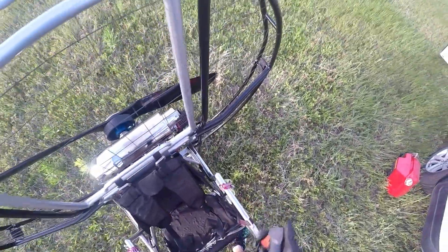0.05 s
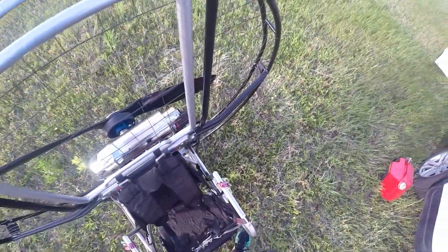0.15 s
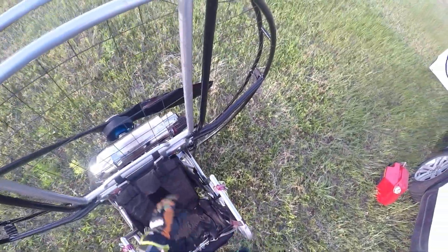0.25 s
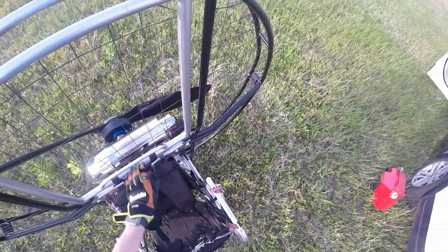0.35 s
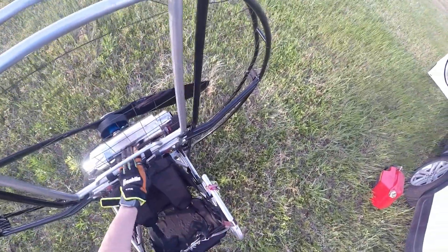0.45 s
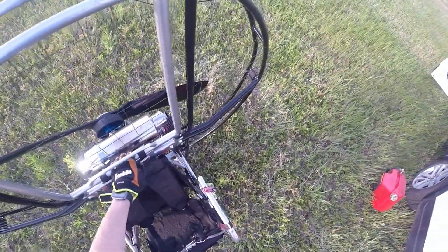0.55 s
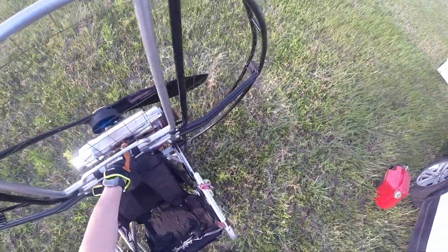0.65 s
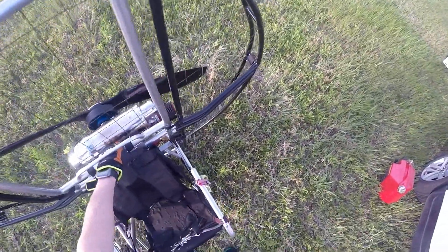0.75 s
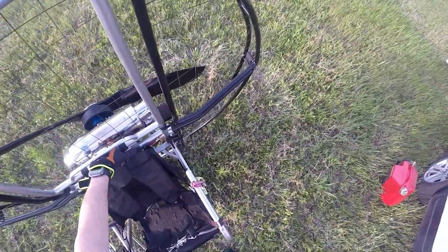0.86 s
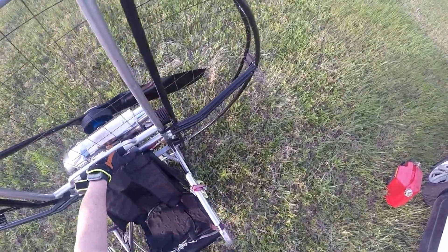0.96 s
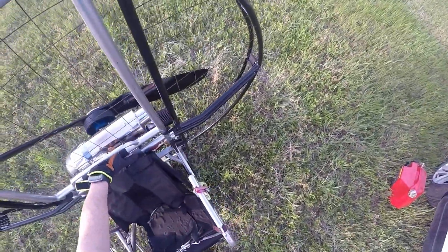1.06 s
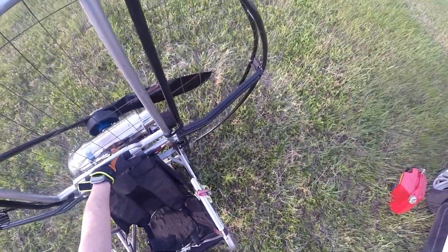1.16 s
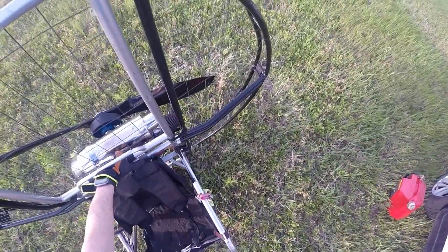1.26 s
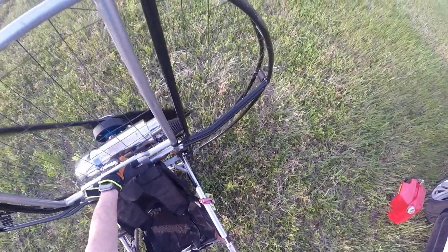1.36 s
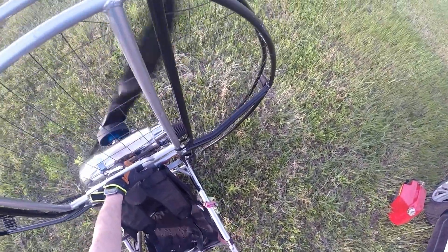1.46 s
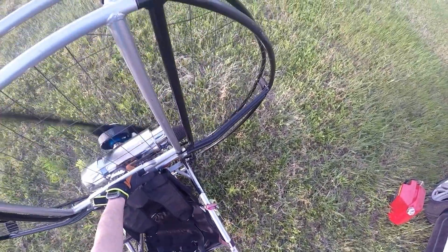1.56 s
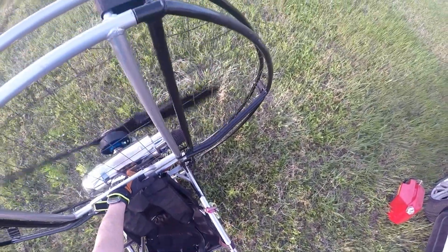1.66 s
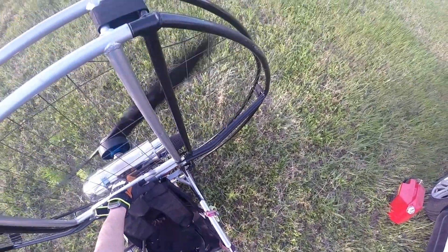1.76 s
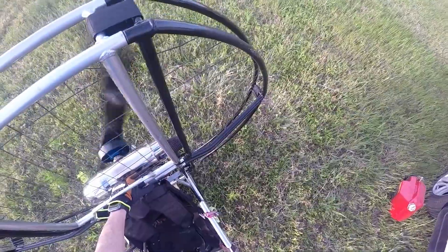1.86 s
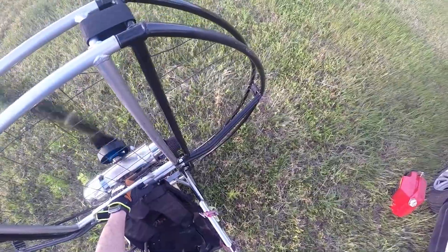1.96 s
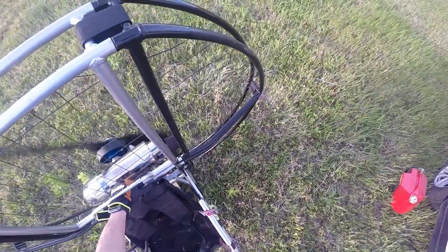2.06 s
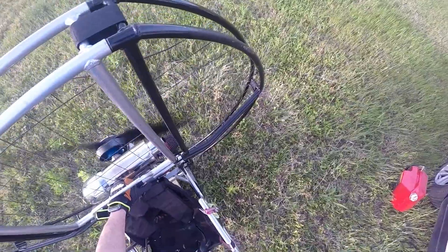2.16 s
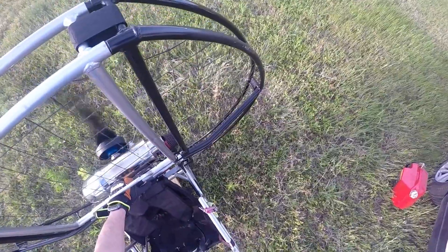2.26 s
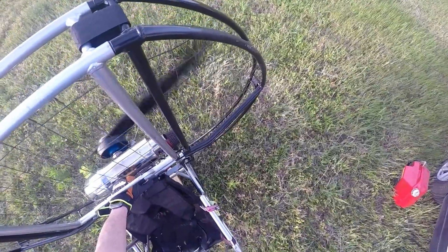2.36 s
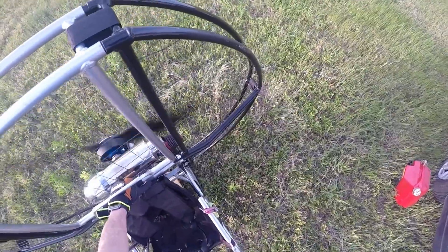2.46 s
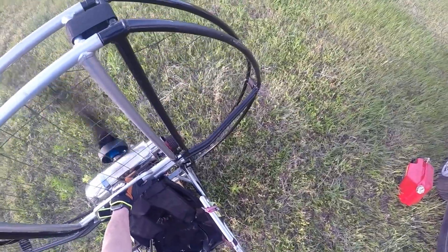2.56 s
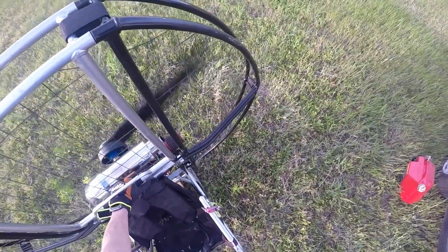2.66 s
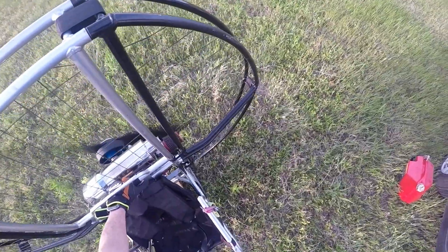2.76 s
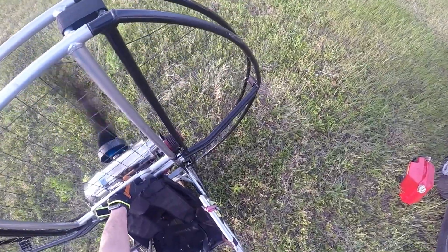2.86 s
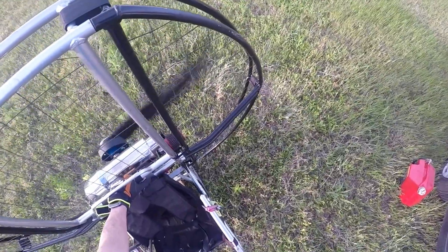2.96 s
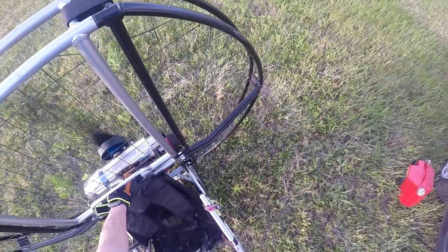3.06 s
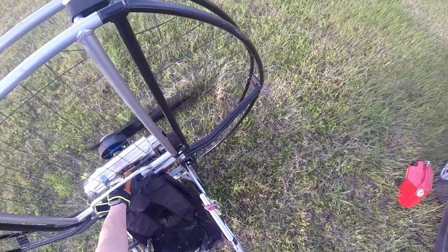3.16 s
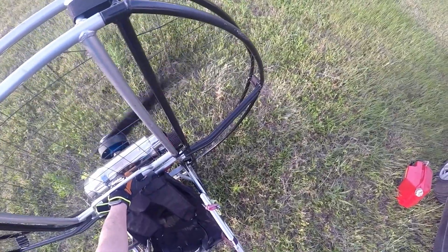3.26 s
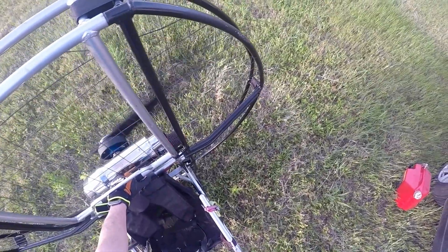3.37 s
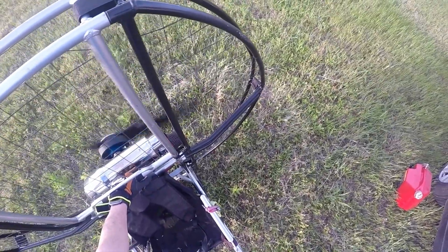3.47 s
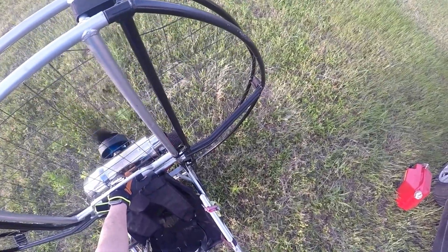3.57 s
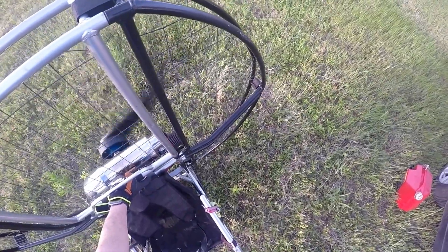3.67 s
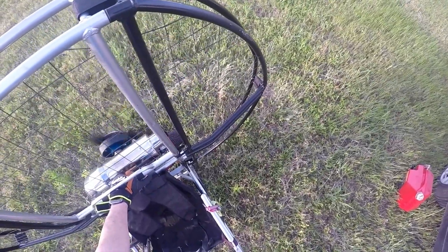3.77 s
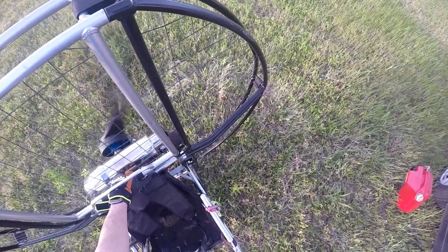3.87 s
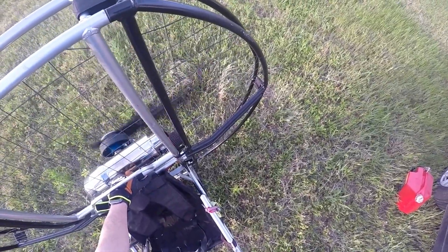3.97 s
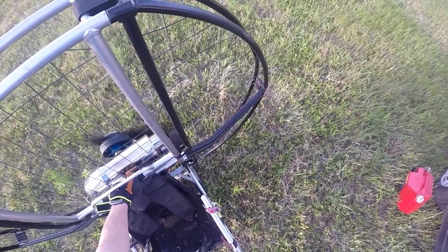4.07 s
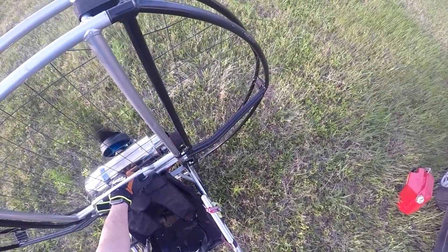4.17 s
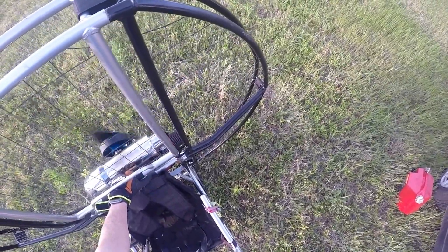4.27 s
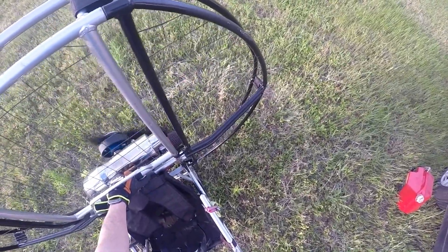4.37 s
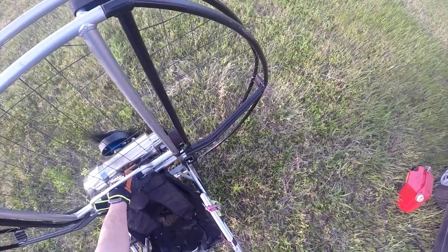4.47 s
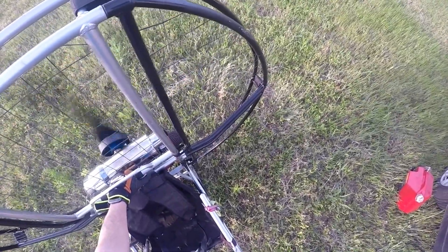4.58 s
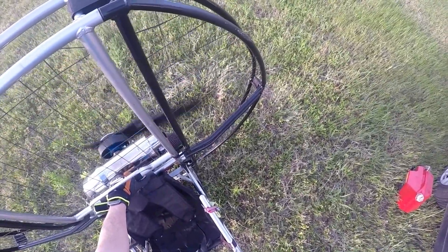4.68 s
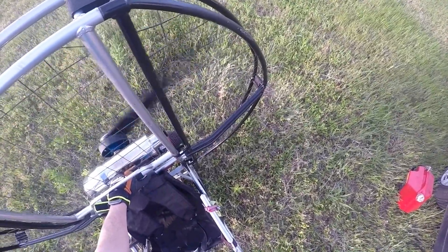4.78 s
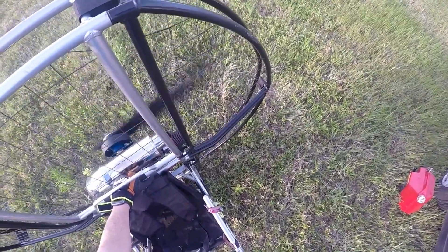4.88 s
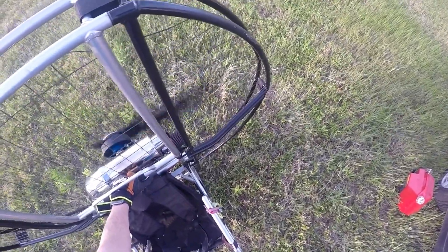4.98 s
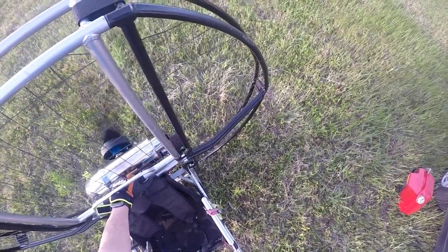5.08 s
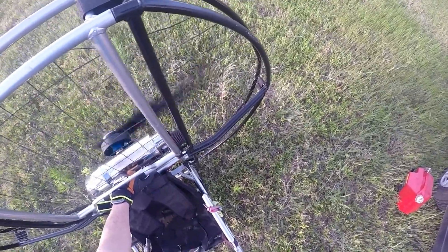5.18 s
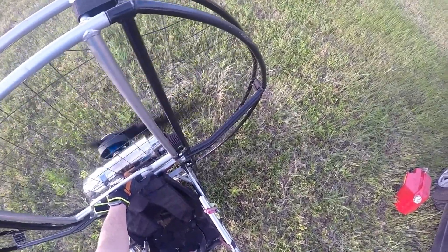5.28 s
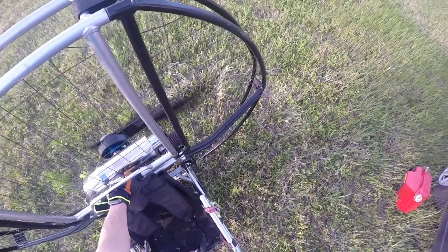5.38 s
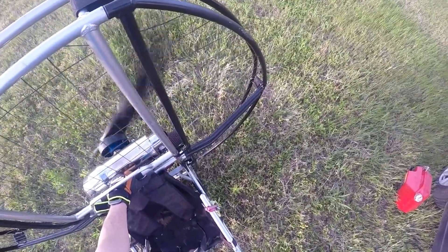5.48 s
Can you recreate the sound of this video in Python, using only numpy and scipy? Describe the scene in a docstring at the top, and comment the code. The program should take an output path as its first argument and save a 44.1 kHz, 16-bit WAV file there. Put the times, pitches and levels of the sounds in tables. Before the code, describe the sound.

An electric starter cranks with a grinding whine, and a small two-stroke engine catches, sputters and pops unevenly outdoors.

```python
"""A faint breeze rumbles over a grass field and a hand taps on a frame. Then, at arm's length, an electric
starter cranks a paramotor's two-stroke; its gears whine, grind until released, and ring on. The engine
catches, fires on every third turn, picks up, then coasts and pops between throttle blips. Each firing is
an impulse that excites resonances: a bark in the exhaust, a knock in the casing. Rattle, grinding,
exhaust hum and propeller wash all grow with crank speed."""
import sys
import numpy as np
from scipy import signal
from scipy.fft import rfft, irfft
from scipy.io import wavfile

SR = 44100
rng = np.random.default_rng(int(sys.argv[2]) if len(sys.argv) > 2 else 0)


def to_wav(sig):
    """Store sig (one row per channel, or 1-D mono) as 16-bit WAV at the path in sys.argv[1].

    Samples outside -1..1 are clipped; the rate is SR.
    """
    pcm = np.clip(np.atleast_2d(sig), -1, 1) * 32767
    pcm = np.round(pcm).astype(np.int16)
    wavfile.write(sys.argv[1], SR, pcm.T)  # frames by channels


N = 243873
T = np.arange(N) / SR
REFERENCE_SPEED = 30  # crank turns per second
MOTOR_ON_S, MESH_S, RELEASE_S, RUN_UP_S = 1.399, 1.44, 3.97, .17  # timing of the starter


def undb(db):
    """Decibels to amplitude ratio."""
    return 10 ** (np.asarray(db) / 20)


def curve(rows, column=1):
    """Linear interpolation of one table column over time."""
    rows = np.array(rows)
    return np.interp(T, rows[:, 0], rows[:, column])


def revs_db(speed, power):
    """Power law: the level change when amplitude grows as a power of crank speed."""
    return 20 * power * np.log10(np.maximum(speed / REFERENCE_SPEED, 1e-6))


def unit(x):
    """Normalisation to rms 1."""
    return x / np.sqrt(np.mean(x ** 2))


def noise():
    """White Gaussian noise."""
    return rng.standard_normal(N)


def cut(x, hz, kind, order=2):
    """Butterworth low- or high-pass."""
    return signal.sosfilt(signal.butter(order, hz, kind, fs=SR, output="sos"), x)


def waver(hz):
    """Random fluctuation of rms 1, mostly slower than hz."""
    return unit(cut(noise(), hz, "low"))


def coloured(spectrum):
    """Spectral shaping of noise, at rms 1."""
    hz, db = np.transpose(spectrum)
    bins_hz = np.arange(N // 2 + 1) * SR / N
    gain = undb(np.interp(np.log(bins_hz + 1), np.log(hz), db))
    return unit(irfft(rfft(noise()) * gain, N))


def resonate(x, modes):
    """Modal superposition: parallel resonances, neighbours in opposite phase."""
    return sum((-1) ** k * undb(db) * signal.lfilter(*signal.iirpeak(hz, hz / width, SR), x)
               for k, (hz, width, db) in enumerate(modes))


def impulses(times, sizes):
    """Impulse train: one sample of the given size at each time."""
    return np.bincount(np.clip(times * SR, 0, N - 1).astype(int), sizes, N)


def bursts(times, db, rise_s, decay_s):
    """An envelope with a smooth attack and exponential decay after each time."""
    t = T[:SR // 4]
    shape = (1 - np.exp(-(t / rise_s) ** 2)) * np.exp(-t / decay_s)
    return signal.fftconvolve(impulses(times, undb(db)), shape / shape.max())[:N]


def impacts(per_s, scatter_db, contact_s):
    """Shot noise: random metal contacts of uneven size, each a brief scrape; rms 1."""
    hits = (rng.random(N) < per_s / SR) * undb(scatter_db * np.clip(noise(), -2, 2))
    energy = signal.lfilter([1], [1, -np.exp(-2 / (contact_s * SR))], hits ** 2)
    return unit(np.sqrt(energy) * noise())


def throb(turns, at, depth_db):
    """Amplitude modulation that peaks at the given fraction of each turn."""
    return undb(depth_db * np.cos(2 * np.pi * (turns - at)))


# Wind buffeting. Each row: frequency in Hz, relative spectral density in dB.
WIND_SPECTRUM = [(10, -11.5), (24, -3.5), (38, -8), (55, -10), (80, -21.5), (120, -26), (200, -36.5),
                 (400, -40.5), (1000, -57.5)]
# The open field's hiss. Each row: frequency in Hz, relative spectral density in dB.
FIELD_SPECTRUM = [(88, -66), (150, -75), (567, -4.5), (1510, -6.5), (1870, -5.5), (2020, -4.5),
                  (2180, -6.5), (3890, -7), (15000, -25.5)]


def air(speed, breeze_db=-48, wash_db=-35, field_db=-66):
    """Turbulence: breeze and propeller wash add in power and rumble under the field's faint hiss."""
    wash = undb(wash_db + revs_db(speed, power=1.04))
    wind = np.hypot(undb(breeze_db), wash) * coloured(WIND_SPECTRUM)
    return wind + undb(field_db + 0.5 * waver(13)) * coloured(FIELD_SPECTRUM)


# A hand grips the frame. Each row: start in seconds, level in dB, pitch in Hz, decay in seconds.
HAND_TAPS = [(.081, -60, 2680, .008), (.295, -65, 2000, 0.032), (.563, -64, 220, 0.0058),
             (.76, -65, 140, .012), (1.07, -57, 199, 0.011)]


def handling():
    """Heavy damping: soft knocks on the frame excite broad, short-lived resonances."""
    taps = 0
    for start, db, hz, decay_s in HAND_TAPS:
        envelope = bursts(np.array([start]), np.array([db]), rise_s=0.0051, decay_s=decay_s)
        taps = taps + envelope * unit(resonate(noise(), [(hz, hz / 2, 0)]))
    return taps


def starter_drive(onset_db=-19, release_db_per_s=174):
    """Exponential growth and decay: the starter's push, 0 to 1, runs up, holds and is released."""
    rise_db = onset_db * np.clip(1 - (T - MOTOR_ON_S) / RUN_UP_S, 0, 1)
    return (T > MOTOR_ON_S) * undb(rise_db - release_db_per_s * np.maximum(T - RELEASE_S, 0))


# The starter's tooth note. Each row: time in seconds, mean tooth rate in Hz, mean level in dB.
TOOTH_NOTE = [(1.45, 1100, -50), (1.5, 1250, -64), (1.535, 1320, -40), (1.61, 1480, -43),
              (1.68, 1720, -33.5), (1.74, 1750, -43), (2.2, 1750, -56)]


def starter_whine(turns, caught_s, swing=0.12):
    """Frequency modulation: until the engine catches, the tooth rate surges and sags once a turn."""
    hz = curve(TOOTH_NOTE) * (1 + swing * np.cos(2 * np.pi * turns)) * (1 + .012 * waver(200))
    phase = 2 * np.pi * np.cumsum(hz) / SR
    level = undb(curve(TOOTH_NOTE, column=2) + 2 * waver(120)) * throb(turns, at=.07, depth_db=4)
    return (T > MESH_S) * (T < caught_s) * level * (np.sin(phase) + .65 * np.sin(2 * phase))


# The starter wheel's modes. Each row: frequency near top speed in Hz, relative level in dB.
WHEEL_MODES = [(3510, -13), (3634, -13), (3725, 0), (7563, -25), (7727, -26), (8074, -26)]


def gear_wheel(speed, level_db=-30, free_at_s=4.117, fade_db_per_s=39, width_hz=16):
    """Centrifugal stiffening: spin raises the wheel's modes slightly; running free, they decay."""
    stiffening = 1 + .0011 * (speed - speed.max() + 2)
    stretched_s = np.cumsum(stiffening) / SR
    free_s = np.maximum(T - free_at_s, 0)
    ring = 0
    for hz, db in WHEEL_MODES:
        amplitude = 0.13 + .5 * waver(width_hz) + .5j * waver(width_hz)
        damping_db = 0.015 * max(hz - 3800, 0) * free_s  # higher modes die sooner
        ring = ring + undb(db - damping_db) * np.real(amplitude * np.exp(2j * np.pi * hz * stretched_s))
    level = undb(level_db + revs_db(speed, power=1) - fade_db_per_s * free_s)
    engaged = np.clip((T - MESH_S) / RUN_UP_S, 0, 1)
    return engaged * level * undb(3 * waver(100)) * unit(ring)


# The starter's steel parts. Each row: frequency in Hz, bandwidth of one stage in Hz, gain in dB.
GEAR_MODES = [(3510, 150, -1), (3780, 300, -1), (4090, 260, 0), (4660, 300, -5), (5250, 250, -13),
              (5620, 160, -13), (6630, 80, -23), (7600, 300, -12), (8050, 160, -15), (8380, 250, -13),
              (9110, 260, -16), (9750, 600, -20), (10600, 300, -28), (11100, 300, -26), (13400, 500, -23),
              (13900, 300, -21)]


def ring_gears(x):
    """Cascaded resonance: two stages per mode give the steel steep-sided peaks."""
    return sum(undb(db) * resonate(resonate(x, [(hz, width, 0)]), [(hz, width, 0)])
               for hz, width, db in GEAR_MODES)


# The pinion slams through its slack. Each row: start in seconds, relative level in dB.
PINION_CLASHES = [(1.4404, -11), (1.6227, -12), (1.7663, -17), (2.02, -24), (2.1226, -12.5),
                  (2.2812, -14.5), (2.3753, -27), (2.7162, -13), (3.185, -12), (3.262, -13.5), (3.374, -19),
                  (3.537, -10.5), (3.618, -8.5), (3.79, -13), (3.895, -19)]


def starter_grind(speed, push, grind_db=-29.5):
    """Friction and backlash: gear teeth grind hardest against compression and clash in their slack."""
    times, clash_db = np.transpose(PINION_CLASHES)
    contacts = impacts(per_s=190, scatter_db=-1.5, contact_s=0.014)
    teeth = push * undb(grind_db + revs_db(speed, power=0.75)) * contacts
    clash = bursts(times, clash_db - 15.5, rise_s=0.00037, decay_s=0.0059) * noise()
    grind = ring_gears(teeth + 1.3 * clash) / np.std(ring_gears(noise()))
    dull = np.interp(T, [1.5, 2.4], [1, 0])  # slow teeth meet softly and lack treble
    grind = dull * cut(grind, 4000, "low", order=1) + (1 - dull) * grind
    casing_ring = cut(undb(17) * resonate(clash, CASING_MODES), 1240, "high", order=6)
    return grind + casing_ring


def high_flicker(speed, hz=10120, per_s=14, level_db=-52):
    """Amplitude modulation: a faint tone near 10 kHz flickers unevenly while the engine runs fast."""
    times = np.cumsum(rng.uniform(.5, 1.5, 160)) / per_s
    times = times[times < T[-1]]
    running_fast = np.clip((speed - 24) / 4, 0, 1)
    flicker_db = level_db + 2 * rng.standard_normal(len(times))
    flicker = bursts(times, flicker_db, rise_s=0.00085, decay_s=0.0095)
    return running_fast * flicker * np.sin(2 * np.pi * hz * T)


# Escaping gas. Each row: frequency in Hz, relative spectral density in dB.
GAS_SPECTRUM = [(600, -5.5), (1500, 20), (4500, 16), (6300, 8.5), (8500, 12.5), (10000, 6.5), (12000, -3),
                (15500, -2.5)]
# Thin steel parts. Each row: frequency in Hz, bandwidth in Hz, relative gain in dB.
THIN_STEEL_MODES = [(8380, 80, -6), (10120, 30, -4), (11110, 60, 0)]


def gas_hiss(rattle, drive, fired, hiss_db):
    """Jet noise: gas hisses out after each firing and leaks in between; thin steel sings with it."""
    puff = bursts(fired, hiss_db + 3, rise_s=0.0022, decay_s=0.021)
    leak = rattle * undb(-26.5 + 5.5 * drive + 3.5 * waver(45)) * (T > MESH_S)
    return (puff + leak) * (coloured(GAS_SPECTRUM) + undb(1.5) * resonate(noise(), THIN_STEEL_MODES))


# The casing's panels. Each row: frequency in Hz, bandwidth in Hz, relative gain in dB.
CASING_MODES = [(1385, 173, -10.5), (1915.5, 128, 3), (2696, 95, -4.5), (2900, 45, -15), (3740, 105, 1.5),
                (4050, 75, 10), (4680, 147, -2), (5200, 35, -4)]


def casing(turns, rattle, fired, knock_db):
    """Impact excitation: loose play rattles each panel separately; a firing knocks them all at once."""
    play = rattle * throb(2 * turns, at=0.71, depth_db=2.5)
    knock = bursts(fired, knock_db + 1, rise_s=0.0019, decay_s=0.0096)
    ring = 0
    for mode in CASING_MODES:
        chatter = play * impacts(per_s=1100, scatter_db=0.5, contact_s=0.0028)
        ring = ring + resonate(chatter + knock * noise(), [mode])
    ring = ring / np.std(resonate(noise(), CASING_MODES))
    radiated = cut(ring, 1100, "high", order=7)  # small panels radiate no bass
    return cut(radiated, 3840, "low", order=4)


# Harmonics in the exhaust. Each row: multiple of the crank speed, relative level in dB.
CRANK_ORDERS = [(5, -12), (6, -2), (7, 0), (8, -9), (9, -6), (10, -6), (11, -7), (12, -7), (13, -7),
                (14, -8), (15, -8)]
# Exhaust resonances that lift them. Each row: frequency in Hz, bandwidth in Hz, gain in dB.
HUM_RESONANCES = [(207, 68, 0), (350, 100, -2), (440, 70, -10)]
# The hum fades in between these two crank speeds, in turns per second.
HUM_ONSET_SPEEDS = [3.3, 38.5]


def exhaust_hum(turns, speed, level_db=-40, waver_db=1.5):
    """Forced vibration: crank harmonics glide with speed and swell as they cross a resonance."""
    hum = 0
    for order, order_db in CRANK_ORDERS:
        lift = sum(undb(db) / (1 + (2 * (order * speed - hz) / width) ** 4)
                   for hz, width, db in HUM_RESONANCES)
        hum = hum + undb(order_db + waver_db * waver(12)) * lift * np.sin(2 * np.pi * order * turns)
    onset = np.interp(speed, HUM_ONSET_SPEEDS, [0, 1])
    return undb(level_db + revs_db(speed, power=.2)) * onset * hum


# The exhaust pipe's air column. Each row: frequency in Hz, bandwidth in Hz, gain in dB.
PIPE_MODES = [(145, 21, 4.5), (204.6, 33, 3.5), (360, 110, 3), (536, 44.3, 5.5), (743, 196, -7.5)]


def exhaust(turns, speed, drive, fired, bark_db, delay_s=0.0015, echo_s=0.00526, echo_gain=0.077):
    """Pipe resonance: a soft puff every turn, turbulent flow and sharp firing pulses excite the air."""
    strokes = np.flatnonzero(np.diff(np.floor(turns)) > 0)
    pumping = undb(-1.5 + revs_db(speed, power=1))
    puffs = cut(impulses(T[strokes] + delay_s, pumping[strokes]), 260, "low", order=1)
    murmur = cut(noise(), 220, "low", order=1)
    flow_db = -34.5 + 3 * drive  # louder while the starter forces the charge through
    flow = undb(flow_db) * np.sqrt(speed / REFERENCE_SPEED) * throb(turns, at=0.34, depth_db=1) * murmur
    pulse = undb(bark_db + 36.5)
    direct = impulses(fired + delay_s, pulse)
    reflected = echo_gain * impulses(fired + delay_s + echo_s, pulse)  # back from the pipe's cone
    ring = resonate(direct + reflected + puffs + flow, PIPE_MODES)
    return cut(cut(ring, 97, "high"), 1230, "low")


# The crankshaft. Each row: time in seconds, speed in turns per second.
CRANK_SPEED = [(1.43, 0), (1.46, 9), (2.26, 12), (2.3, 20.5), (3.05, 21), (3.7, 37), (4.0, 37),
               (4.23, 33.6), (4.44, 26.8), (4.55, 31.7), (4.82, 24), (4.89, 31.5), (5.05, 31.7),
               (5.2, 39.6), (5.53, 28.5)]
# The starter forces the piston over top centre. Each entry: time in seconds.
COMPRESSION_TIMES = [1.56, 1.67, 1.775, 1.868, 1.96, 2.035, 2.12, 2.205]


def crankshaft(fired):
    """Angle is the integral of speed, adjusted so compressions and firings fall on whole turns."""
    speed = curve(CRANK_SPEED)
    turns = np.cumsum(speed) / SR
    top_times = np.concatenate([COMPRESSION_TIMES, fired])
    at_top = np.interp(top_times, T, turns)
    whole = np.cumsum(np.round(np.diff(at_top, prepend=0)))
    return speed, turns + np.interp(T, top_times, whole - at_top)


def combustion(fired, force_db, turns, speed):
    """Incomplete scavenging: firing on consecutive turns leaves less fresh charge, softening each sound."""
    revs = np.interp(fired, T, speed)
    stale = np.round(np.diff(np.interp(fired, T, turns), prepend=0)) == 1
    bark_db = -30 + .2 * force_db + revs_db(revs, power=.6) - 2.5 * stale
    knock_db = -21 + force_db + revs_db(revs, power=0.72) - 11.5 * stale
    hiss_db = -36 + 0.35 * force_db - 10 * stale
    return bark_db, knock_db, hiss_db


# The charge ignites. Each row: start in seconds, relative force in dB.
IGNITIONS = [(2.285, -6), (2.336, 6.5), (2.431, -4.5), (2.579, -1), (2.724, 1.5), (2.865, -0.5), (3.005, 1),
             (3.101, -6), (3.187, -5), (3.268, 5), (3.341, -0.5), (3.377, -13), (3.413, 13.5), (3.444, -19),
             (3.475, 13.5), (3.506, 8), (3.537, -4), (3.568, 5), (3.595, -5), (3.625, 4), (3.68, 0.5),
             (3.73, 2.5), (3.787, 3.5), (3.84, -0.5), (3.894, 6.5), (3.946, 1), (4.003, -3.5), (4.058, -44),
             (4.086, 8), (4.203, 3), (4.465, 6), (4.53, 1.5), (4.854, 1.5), (4.889, 7), (4.92, 8.5),
             (4.982, -2.5), (5.047, -0.5), (5.077, -12), (5.107, 10), (5.133, 8.5), (5.161, 8), (5.186, 10)]


def scene():
    """Superposition: engine and starter, coupled by one crankshaft, sound over the open air."""
    fired, force_db = np.transpose(IGNITIONS)
    speed, turns = crankshaft(fired)
    drive = starter_drive()
    bark_db, knock_db, hiss_db = combustion(fired, force_db, turns, speed)
    # while the starter is in mesh, each compression loads the whole drive
    load = throb(turns, at=.02, depth_db=drive * np.interp(speed, [12, 21], [4.2, 3]))
    starter_shake = drive * undb(-31)
    engine_shake = undb(-33 + revs_db(speed, power=1.24))
    rattle = np.hypot(starter_shake, engine_shake)
    pipe = exhaust(turns, speed, drive, fired, bark_db) + exhaust_hum(turns, speed)
    body = casing(turns, rattle * load, fired, knock_db) + gas_hiss(rattle, drive, fired, hiss_db)
    starter = starter_grind(speed, drive * load) + starter_whine(turns, fired[0]) + gear_wheel(speed)
    return (pipe + body + starter + high_flicker(speed) + handling() + air(speed))[None]


def record(dry):
    """Band limiting: a steep low-pass removes the treble above 15250 Hz."""
    return signal.sosfilt(signal.ellip(10, .2, 70, 15250, fs=SR, output="sos"), dry)


dry = scene()
out = record(dry)
to_wav(out)
```